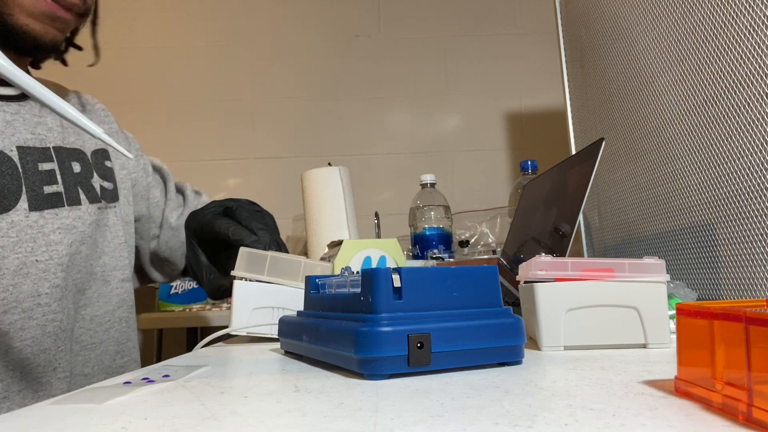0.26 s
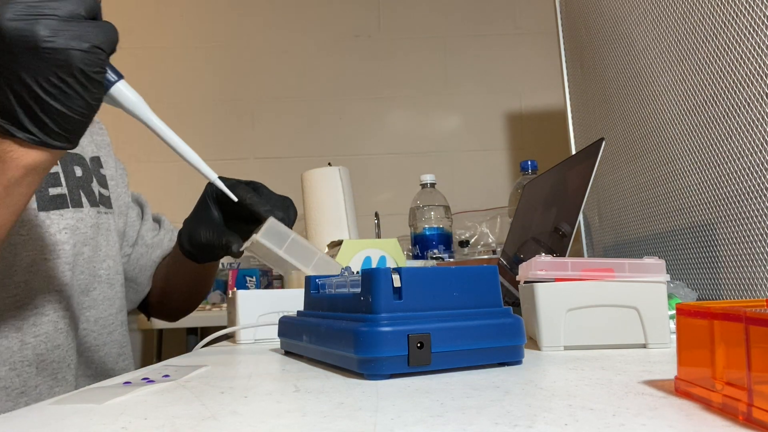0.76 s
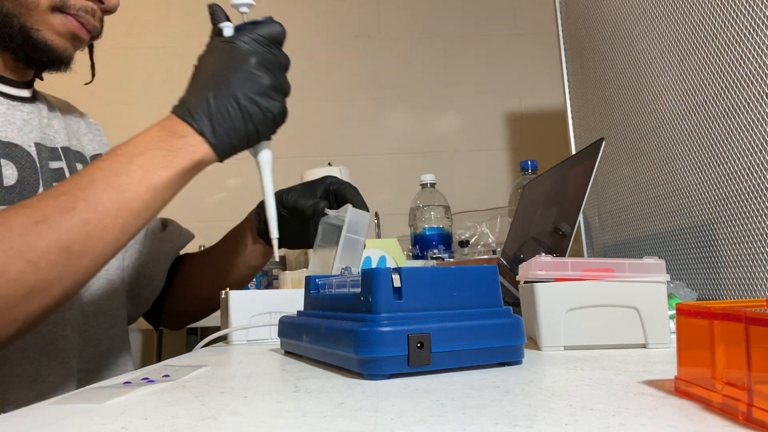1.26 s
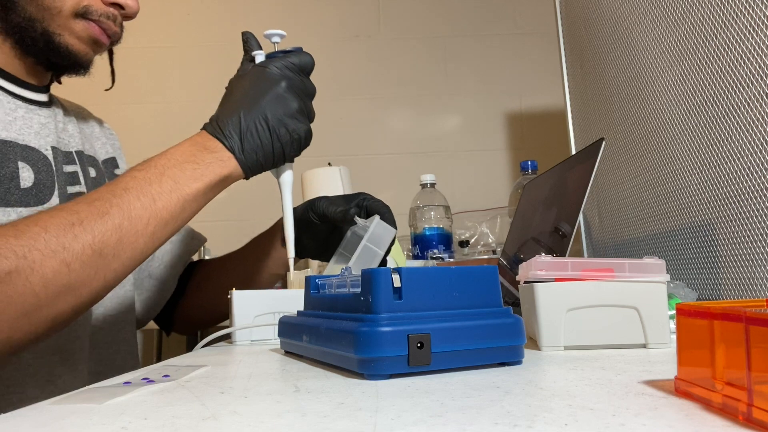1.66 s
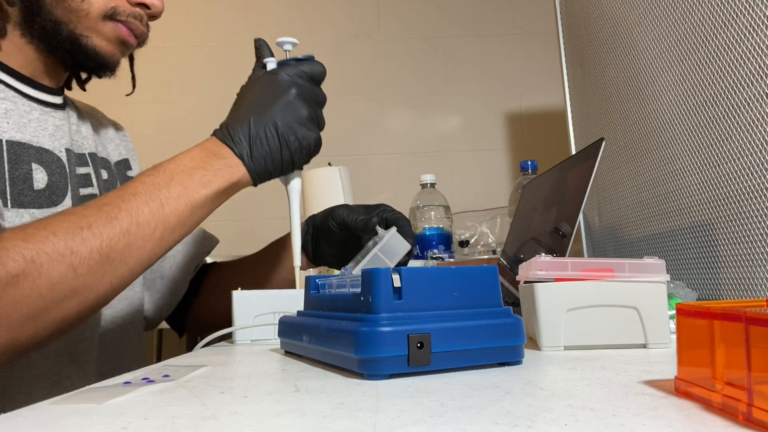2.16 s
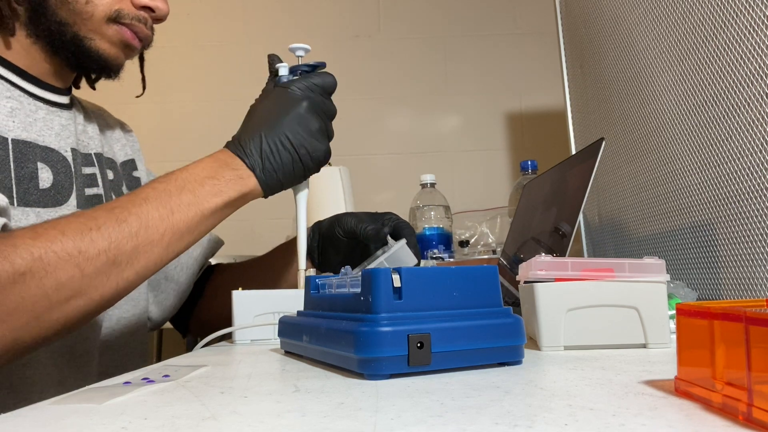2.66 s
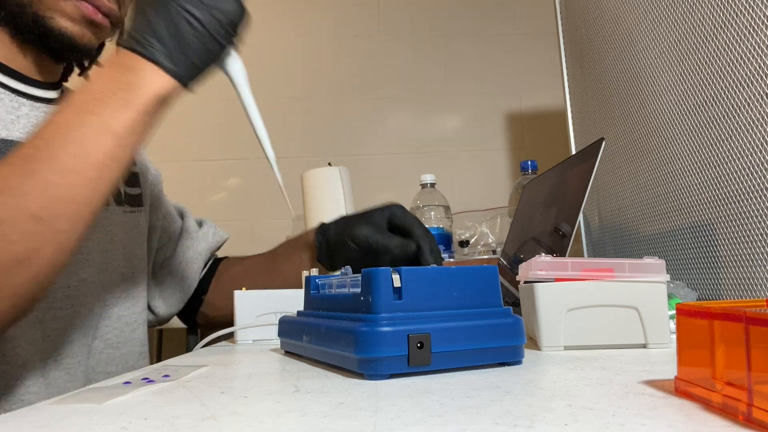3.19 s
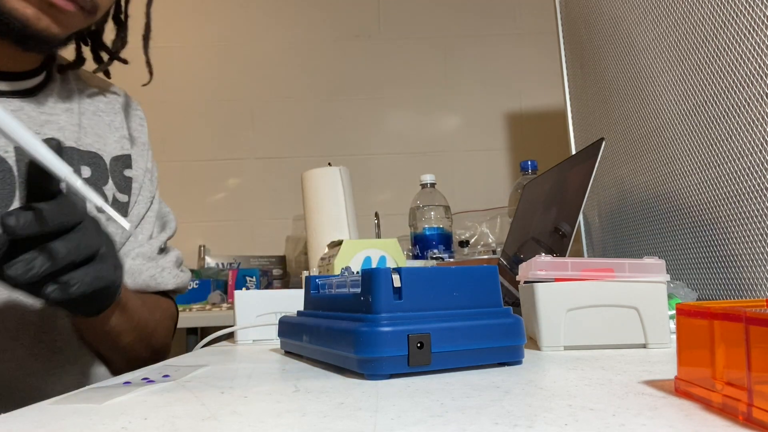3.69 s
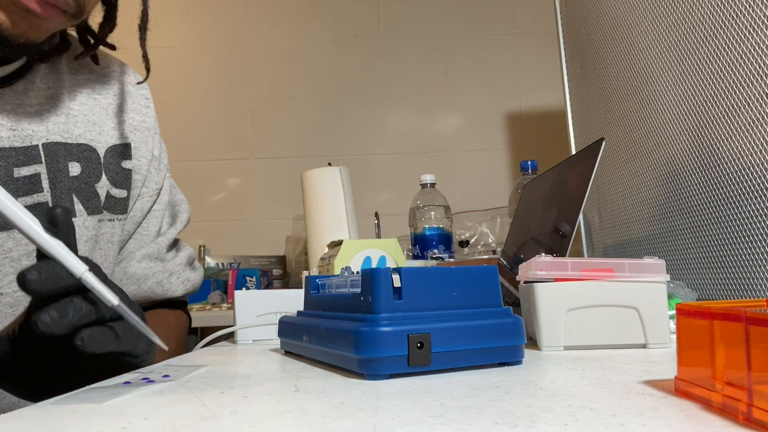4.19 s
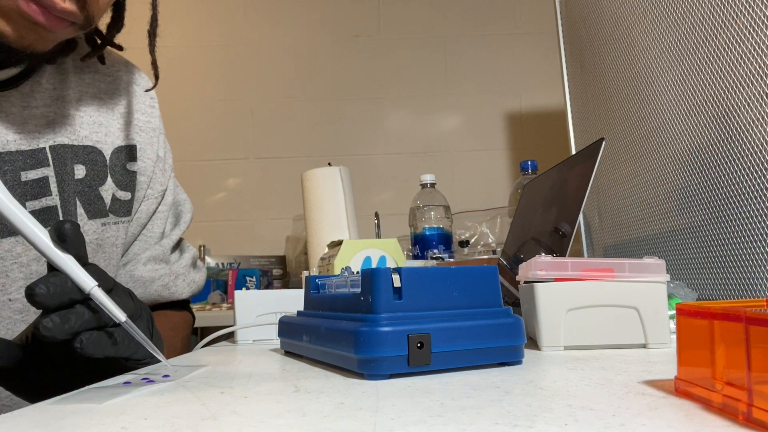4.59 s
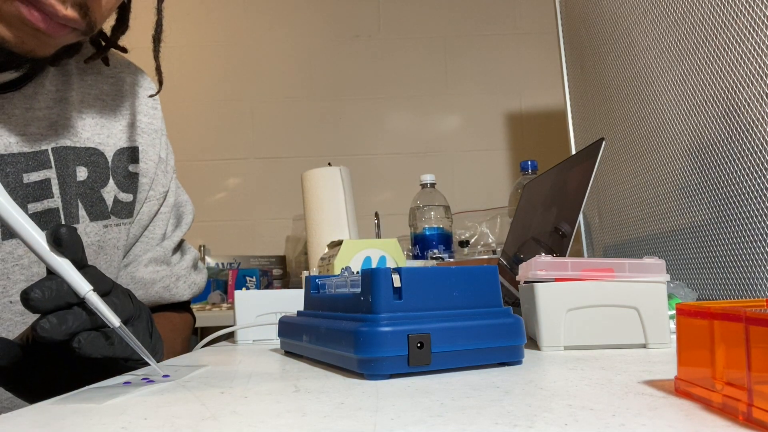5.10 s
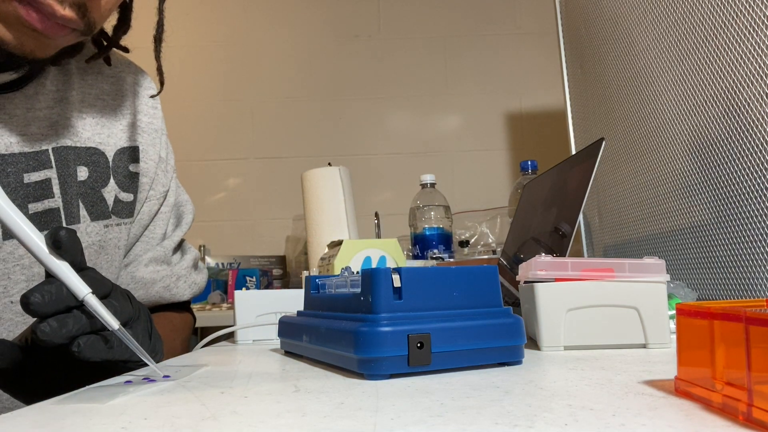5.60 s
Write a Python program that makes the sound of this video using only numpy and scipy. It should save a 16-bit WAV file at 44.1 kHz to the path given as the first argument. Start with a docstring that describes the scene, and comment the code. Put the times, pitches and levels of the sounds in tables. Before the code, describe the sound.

In a small humming room, light plastic knocks, a sharp lid snap, two soft rack presses and a closing clack, then only fan air.

```python
"""Fan air and a wavering mains buzz fill a small room throughout, as filtered noise and four sines.
First a plastic tip box knocks and is slid: damped modes under noise cracks, then hiss broken by slips.
Its lid snaps open with a sagging low thud, and a pipette is pressed twice into the rack of tips.
The lid falls shut and a swung tip whistles faintly, a falling tone blurred by noise.
Small ticks of tuned noise lie between, and the walls answer each knock with brief, dense echoes."""
import sys
import numpy as np
from scipy import signal
from scipy.fft import rfft, irfft
from scipy.io import wavfile

SR = 44100
rng = np.random.default_rng(int(sys.argv[2]) if len(sys.argv) > 2 else 0)


def digitize_waveform(pressure):
    """Quantize a signal to 16-bit integers and store it at the path in sys.argv[1].

    Rows of a 2-D input are taken as channels; values are limited to [-1, 1].
    """
    field = np.atleast_2d(pressure).T
    bounded = np.clip(field, -1, 1)
    quanta = np.round(bounded * 32767).astype(np.int16)
    wavfile.write(sys.argv[1], SR, quanta)


N = 257984

# how alike the noise is in the two microphone ports: [f/Hz, likeness 0-1]
PORT_LIKENESS = [(30, .75), (120, .92), (300, .72), (550, .35), (1500, .2), (6500, .15), (7500, .45),
                 (8600, .995), (16000, .995)]


def gain_of(db):
    """Decibels to an amplitude factor."""
    return 10 ** (np.asarray(db) / 20)


def evened(x):
    """Scales to rms 1."""
    return x / np.sqrt(np.mean(x ** 2) + 1e-20)


def read(points, hz):
    """Reads a table on a log-frequency axis."""
    f, value = np.transpose(points)
    return np.interp(np.log(hz + 1), np.log(f + 1), value)


def add(mix, s, sound, pan_db):
    """Lays a sound into both channels at time s, with pan_db as left minus right."""
    part = mix[:, round(s * SR):][:, :sound.shape[-1]]
    part += gain_of([[pan_db / 2], [-pan_db / 2]]) * sound[..., :part.shape[1]]


def coloured(db_of_hz, count):
    """Noise of rms 1 with the given spectrum."""
    hz = np.fft.rfftfreq(count, 1 / SR)
    return evened(irfft(rfft(rng.standard_normal(count)) * gain_of(db_of_hz(hz)), count))


def wander(top_hz):
    """Slow random drift of rms 1."""
    return coloured(lambda hz: -40 * np.log10(1 + (hz / top_hz) ** 2), N)


def lowpassed_noise(corner_hz, count):
    """Noise of rms 1 that thins out gently above the corner."""
    return coloured(lambda hz: -20 * np.log10(1 + (hz / corner_hz) ** 2), count)


def partly_alike(one, other, likeness):
    """Two spectra of equal power that share as much as the likeness says."""
    return np.array([one, likeness * one + np.sqrt(1 - likeness ** 2) * other])


def ports(x, is_near):
    """Balance and phase between the two ports by frequency; near sounds keep their own balance."""
    # balance of the room air: [f/Hz, left minus right/dB]
    air_balance = [(30, -12.5), (120, -6.5), (250, -1.5), (550, -5), (1100, -0.5), (1700, 1), (6500, 1),
                   (8500, 0.5), (16000, -0.5)]
    # phase turn between left and right, flat below 6.5 kHz, stepping through the treble: [f/Hz, turn/rad]
    treble_turn = [(0, 0), (6500, 0), (8700, -3.05), (10100, -3.25), (11000, -6.2), (13000, -6.35),
                   (13900, -9.35), (16000, -9.5)]
    # lead of the right port for the low ring of things on the table: [f/Hz, lead/rad]
    near_lead = [(0, 0), (250, 1.5), (850, 1.7), (1300, .2), (6500, 0)]
    # lead of the right port for the distant fans: [f/Hz, lead/rad]
    fan_lead = [(0, 0), (950, 3), (5000, 3), (6500, 0)]
    hz = np.fft.rfftfreq(x.shape[1], 1 / SR)
    tilt = gain_of(read(air_balance, hz) / 2 * (1 - is_near))
    turn = np.interp(hz, *np.transpose(treble_turn))
    turn += np.interp(hz, *np.transpose(near_lead if is_near else fan_lead))
    return irfft(rfft(x) * [tilt, np.exp(1j * turn) / tilt], x.shape[1])


def air():
    """Fan noise with duct resonances, partly alike in both ports, and a mains buzz that wavers a little."""
    # colour of the fan air: [f/Hz, relative level/dB]
    air_colour = [(15, -64), (25, -44), (49, -11.5), (91, -8), (105, -4.5), (123, 2), (148, -4),
                  (400, -9.5), (670, -14), (1100, -22.5), (2000, -30), (3500, -35.5), (5000, -40),
                  (8200, -46), (10000, -51), (13000, -56.5), (16000, -57)]
    # resonances that stand out of the air: [f/Hz, width/Hz, lift/dB]
    duct_modes = [(62, 22, -0.5), (189.2, 46.4, 4.5), (212.3, 11, 3), (401.7, 15.3, 6.5), (517, 8.3, 5),
                  (600, 13.4, 5.5), (1500, 79, 6.5), (2360, 620, 3)]
    # buzz at 1, 2, 4 and 6 times the mains rate, ahead of the port balance: [level/dB rms]
    hum_levels = [-50.5, -31, -45.5, -46]
    air_db, mains_hz = -29.5, 60.0
    hz = np.fft.rfftfreq(N, 1 / SR)
    shape_db = read(air_colour, hz)
    for f, width, lift_db in duct_modes:
        shape_db += lift_db / (1 + (2 * (hz - f) / width) ** 2)
    one, other = rfft(rng.standard_normal((2, N)))
    noise = irfft(partly_alike(one, other, read(PORT_LIKENESS, hz)) * gain_of(shape_db), N)
    noise = gain_of(air_db + 0.2 * wander(top_hz=2.3)) * evened(noise)
    turns = mains_hz * np.arange(N) / SR
    hum = np.zeros(N)
    for k, db in enumerate(hum_levels):
        multiple = 2 * k or 1
        hum += gain_of(db) * np.sqrt(2) * np.sin(2 * np.pi * (multiple * turns + rng.random()))
    return ports(noise + gain_of(0.2 * wander(top_hz=7.9)) * hum, is_near=False)


def walls(colour_db):
    """Dense echoes of one blow, duller than the blow: they build up, and each band dies at its own speed."""
    # decay of the room: [f/Hz, t60/s]
    wall_decay = [(200, 0.4), (700, 0.32), (2000, 0.24), (6000, 0.22), (14000, 0.28)]
    hz, t, z = signal.stft(rng.standard_normal((2, SR // 2)), SR, nperseg=256)
    dull_db = -3.6 * np.log2(1 + hz / 1500)
    fade_db = -60 * t / read(wall_decay, hz)[:, None]
    one, other = z * gain_of((colour_db(hz) + dull_db)[:, None] + fade_db)
    likeness = np.maximum(read(PORT_LIKENESS, hz), .45)[:, None]
    tail = signal.istft(partly_alike(one, other, likeness), SR, nperseg=256)[1]
    s = np.arange(tail.shape[1]) / SR
    build = 1 - np.exp(-(s / .01) ** 2)
    # early echoes arrive in lumps, later ones blend
    lumps_db = 2.2 * np.exp(-s / .08) * lowpassed_noise(200, len(s))
    loudness = np.abs(tail[:, :SR // 20]).mean()  # of the first 50 ms
    return build * gain_of(lumps_db) * tail / loudness


def knocks():
    """Each contact rings damped modes under a noise crack and rebounds; the walls scatter its crack."""
    # modes of the lid: [f/Hz, level/dB, t60/s]
    lid_modes = [(165, -2.5, .08), (303, 3.5, 0.075), (418, -.5, 0.06), (515, 3.5, 0.09), (650, 4.5, .045),
                 (750, .5, 0.06), (908, 1.5, 0.07), (1035, -2, .04), (1210, .5, .025), (1325, .5, 0.03),
                 (1460, -.5, .03), (1700, -2, 0.02), (2570, 4, .009), (2930, 4, .008), (3360, 0, 0.012),
                 (5370, 0, 0.006)]
    # modes of the box: [f/Hz, level/dB, t60/s]
    box_modes = [(460, 3.5, 0.05), (600, 2.5, 0.045), (775, 3.5, 0.035), (915, -2, 0.038), (1040, 0, .03),
                 (1125, 7, 0.038), (1450, 2, 0.022), (1800, 4.5, 0.022), (2100, -3, .018), (2280, 2, 0.018),
                 (2700, -4, .012), (3120, -2, .011), (3400, -2, .011), (3800, -3, .01)]
    # modes of the rack of tips: [f/Hz, level/dB, t60/s]
    rack_modes = [(590, -3, .025), (840, 1.5, 0.025), (1000, 0, .02), (1130, -0.5, .02), (1450, 1, 0.02),
                  (1600, 2.5, .022), (1850, 3.5, 0.026), (2300, -1, 0.012), (3200, -4, .013),
                  (4530, -10, .009), (6050, -9, 0.01)]
    # snap of plastic: [f/Hz, relative level/dB per Hz]
    crack_colour = [(150, -19), (500, 1), (1500, -6.5), (3000, -8), (6000, -14.5), (9000, -14.5),
                    (12000, -21.5), (16000, -34)]
    # contacts; a part first catches and then seats a few ms later:
    # [what, t/s, ring level/dB, ring brightness/dB per octave, crack level/dB, echo level/dB,
    #  left minus right/dB, share of the free ring time that the holding hand leaves]
    contacts = [("box", .0414, -25.5, -2.5, -30, -44, .85, .45), ("lid", .7408, -32, -3, -40, -50, -3, .3),
                ("lid", .7436, -19.5, 2.5, -7, -25.5, 4, .7), ("lid", .7452, -14, -2.2, -16, -33, -5, .9),
                ("lid", .7487, -26, .5, -19, -38, .1, .8), ("lid", .778, -30, -2.5, -36, -48, -3, .4),
                ("rack", 2.096, -27, -1.5, -35, -44, -7, .95), ("rack", 2.1003, -35, 3.5, -30, -42, 5, .95),
                ("rack", 2.1135, -37, 1.5, -39, -50, .1, .95), ("rack", 2.585, -26.5, -1, -26, -38, -5, .7),
                ("rack", 2.5905, -29, .5, -28, -39, -3, .7), ("rack", 2.5965, -32, -3, -38, -46, -3, .8),
                ("rack", 2.604, -33, 2.5, -32, -42, -1.5, .7), ("rack", 2.609, -36, .1, -35, -41, -1.5, .7),
                ("rack", 2.6305, -39, .5, -39, -46, -1.5, .6),
                ("box", 3.0768, -30, 1.5, -23, -40, -2.2, .8),
                ("box", 3.0789, -20.5, .1, -16.5, -32, -4.4, .95),
                ("box", 3.0915, -30, -3, -36, -46, -3, .6), ("box", 3.1005, -30, -3, -36, -46, -3, .6),
                ("box", 3.1105, -35, -.5, -37, -48, -3, .6)]
    # modes, crack tilt in dB per octave, gap between rebounds in s, cycles in which a mode swings up
    struck = {"lid": (lid_modes, -.7, .004, .8),
              "box": (box_modes, -.44, .0065, .3),
              "rack": (rack_modes, -1.1, .0085, .3)}
    crack_t60_s = .015  # in a part that rings freely
    chatter, chatter_hz = .32, 180  # loose parts shake each mode's ring: rms depth, noise corner
    rebounds, rebound_fade_db = 2, -2.5  # after every contact; fade from one rebound to the next
    rebound_ring_db, rebound_crack_db = -14, -22  # first rebound below the contact
    out, t = np.zeros((2, N)), np.arange(8192) / SR
    rise = 1 - np.exp(-t / .0005)

    for what, s, ring_db, bright_db, crack_db, echo_db, pan_db, free in contacts:
        modes, tilt_db, gap, cycles = struck[what]
        hz, db, t60 = np.transpose(modes)[:, :, None]
        side = (-1.) ** np.arange(len(modes))[:, None]  # neighbouring modes start in opposite directions
        shake = 1 + chatter * np.array([lowpassed_noise(chatter_hz, len(t)) for _ in modes])
        level_db = ring_db + db + bright_db * np.log2(hz / 1000) - 60 * t / (free * t60)
        swing_up = 1 - np.exp(-t * hz / cycles)
        ring = (swing_up * side * shake * gain_of(level_db) * np.sin(2 * np.pi * hz * t)).sum(0)

        def colour_db(f):
            """Plastic snap tilted for the part that is struck."""
            return read(crack_colour, f) + tilt_db * np.log2((f + 1) / 1000)

        def crack():
            """A fresh noise burst, mostly alike left and right; the hand damps it less than the ring."""
            fade = gain_of(crack_db - 60 * t / (np.sqrt(free) * crack_t60_s))
            middle = coloured(colour_db, len(t))
            sides = .3 * np.array([[1], [-1]]) * coloured(colour_db, len(t))
            return rise * fade * (middle + sides)

        add(out, s, ring, pan_db)
        add(out, s, crack(), .3 * pan_db)
        add(out, s, gain_of(echo_db) * walls(colour_db), pan_db=1)
        for k in range(rebounds):
            again = gain_of(rebound_ring_db) * ring + gain_of(rebound_crack_db) * crack()
            rebound_s = s + gap * (k + rng.uniform(.85, 1.15))
            add(out, rebound_s, gain_of(k * rebound_fade_db) * again, .3 * pan_db)
    return out


def ticks():
    """Brief puffs of noise around one pitch; higher ones die sooner."""
    # small ticks: [t/s, level/dB, centre f/Hz, distance at which it is 10 dB down/octaves,
    #  left minus right/dB]
    tick_rows = [(.0415, -38, 6500, 1.1, .1), (.9535, -42, 2200, 1.5, -1), (1.565, -47, 5500, .6, .1),
                 (1.943, -43, 4970, 1.2, .1), (2.51, -46, 4000, 1.2, -2.2), (2.88, -43, 5570, .3, 2.2),
                 (2.88, -36, 1340, .2, -3), (2.9347, -35.5, 6000, 1.9, 6), (5.76, -49, 8000, 1.1, -9)]
    fall_s, shortens = .015, .6  # time to fall 20 dB at 1 kHz; power by which it shortens with pitch
    out, t = np.zeros((2, N)), np.arange(2048) / SR
    for s, db, hz, octaves, pan_db in tick_rows:
        puff = coloured(lambda f: -10 * (np.log2((f + 1) / hz) / octaves) ** 2, len(t))
        length = fall_s * (1000 / hz) ** shortens
        rise = 1 - np.exp(-t / 0.00065)
        add(out, s, gain_of(db - 20 * t / length) * rise * puff, pan_db)
    return out


def rubs():
    """Friction: a hiss broken by uneven slips; each stroke starts quickly, holds and lets go."""
    # plastic rubbing on plastic, one row a stroke:
    # [start t/s, time from start to release/s, level/dB, brightness/dB per octave]
    strokes = [(.172, .045, -32, .8), (.312, .088, -35, .6), (.435, .025, -42, .1), (.695, .05, -35.5, -.5),
               (.884, .015, -43, .1), (.945, .028, -41, 2.5)]
    # colour of the hiss: [f/Hz, relative level/dB per Hz]
    rub_colour = [(300, 5.5), (800, -10), (1800, -8.5), (3000, -15.5), (6000, -29.5), (9000, -36),
                  (14000, -45)]
    attack_s, release_db_per_s = .02, -260
    slips_per_s, slip_spread_db, slip_share = 700, 3, .55  # stick-slip jerks in a stroke
    out, t = np.zeros((2, N)), np.arange(SR // 4) / SR
    slip_decay = np.exp(-1 / (.0012 * SR))  # each jerk dies with a time constant of 1.2 ms
    for s, hold, db, bright_db in strokes:
        slip_gain = gain_of(slip_spread_db * np.minimum(rng.exponential(1, len(t)), 3))
        slips = slip_gain * (rng.random(len(t)) < slips_per_s / SR)
        jerks = evened(signal.lfilter([1], [1, -slip_decay], slips))
        grip = 1 - slip_share + slip_share * jerks
        hz = np.fft.rfftfreq(len(t), 1 / SR)
        colour = gain_of(read(rub_colour, hz) + bright_db * np.log2((hz + 1) / 1000))
        rub = evened(irfft(rfft(grip * rng.standard_normal(len(t))) * colour, len(t)))
        stroke_db = db + release_db_per_s * np.maximum(t - hold, 0)
        add(out, s, np.minimum(t / attack_s, 1) * gain_of(stroke_db) * rub, pan_db=-2.5)
    return out


def thuds():
    """The table top: a low, damped swing that starts softly, downwards, and sinks in pitch."""
    # thuds: [t/s, level/dB]
    thud_rows = [(.758, -27), (2.5946, -18)]
    # the stiff top answers first: [f/Hz, level/dB, t60/s]
    top_modes = [(180, -3, .07), (240, -1.5, .1)]
    start_hz, end_hz, settle_s, t60_s = 100, 56, .012, .19  # the pitch sags as the top gives way
    out, t = np.zeros((2, N)), np.arange(SR // 2) / SR
    hz = end_hz + (start_hz - end_hz) * np.exp(-t / settle_s)
    swing = -(1 - np.exp(-t / .001)) * np.sin(2 * np.pi * np.cumsum(hz) / SR)
    knock = np.zeros(len(t))
    for f, db, mode_t60 in top_modes:
        knock -= gain_of(db - 60 * t / mode_t60) * np.sin(2 * np.pi * f * t)
    thud = gain_of(-60 * t / t60_s) * swing + knock
    for s, db in thud_rows:
        add(out, s, gain_of(db) * thud, pan_db=-6.5)
    return out


def whistle():
    """The long tip swung through the air: a thin tone that sinks and settles, blurred by turbulence."""
    at_s, length_s, level_db, dip_db = 3.315, .19, -59, -7  # it weakens midway
    start_hz, end_hz, settle_s = 7800, 5600, .09
    out, t = np.zeros((2, N)), np.arange(0, length_s, 1 / SR)
    hz = end_hz + (start_hz - end_hz) * np.exp(-t / settle_s)
    flutter = lowpassed_noise(160, len(t))
    tone = np.sin(2 * np.pi * np.cumsum(hz) / SR) * signal.windows.tukey(len(t), .4)
    gain = gain_of(level_db + dip_db * np.sin(np.pi * t / length_s) ** 4)
    add(out, at_s, gain * flutter * tone, pan_db=2.5)
    return out


def scene():
    """The room, and hands on the table with their echoes; the thuds skip the phase turns."""
    near = knocks() + ticks() + rubs() + whistle()
    return air() + ports(near, is_near=True) + thuds()


def record(dry):
    """The loudest peaks are rounded off, then a steep low-pass limits the band."""
    edge_hz = 15840
    rounded = dry / (1 + np.abs(dry / .97) ** 6) ** (1 / 6)
    band_limit = signal.firwin(2047, edge_hz, window=("kaiser", 10), fs=SR)
    return signal.oaconvolve(rounded, band_limit[None], "same")


dry = scene()
out = record(dry)
digitize_waveform(out)
```